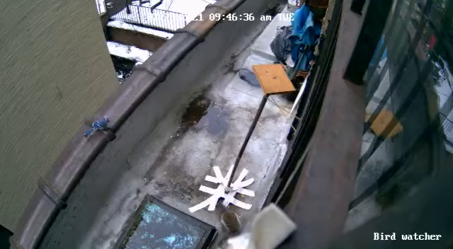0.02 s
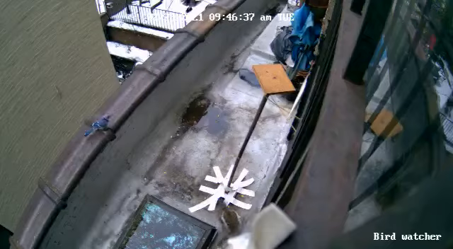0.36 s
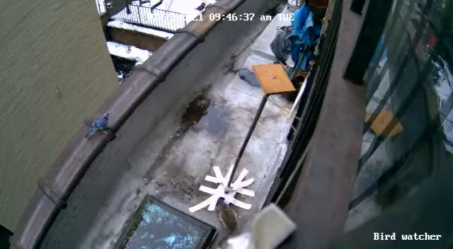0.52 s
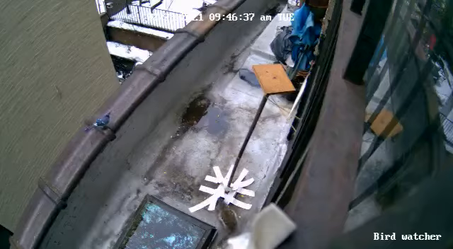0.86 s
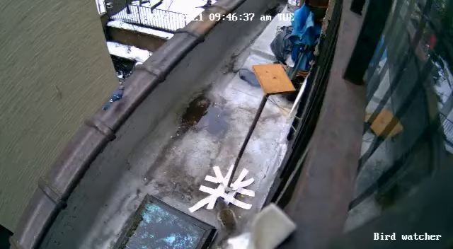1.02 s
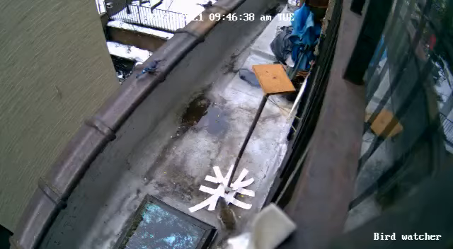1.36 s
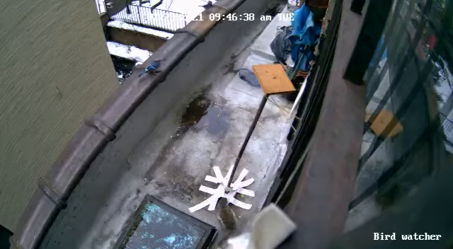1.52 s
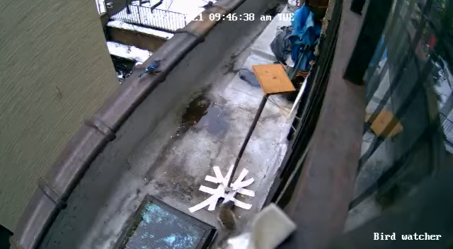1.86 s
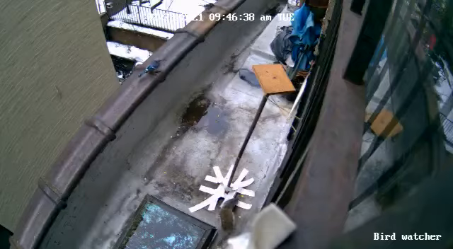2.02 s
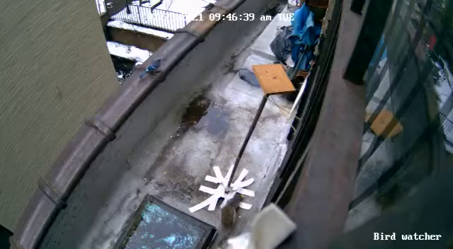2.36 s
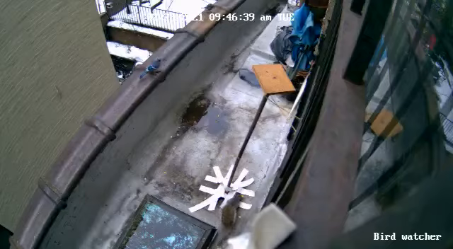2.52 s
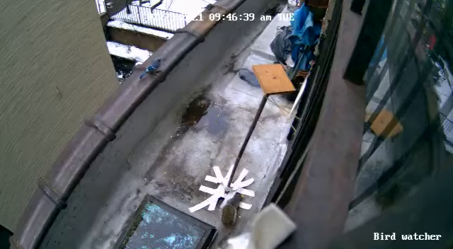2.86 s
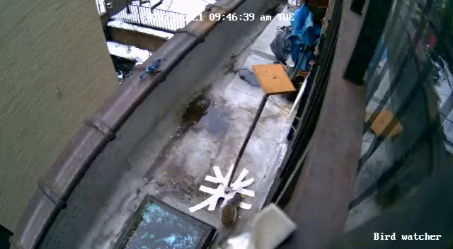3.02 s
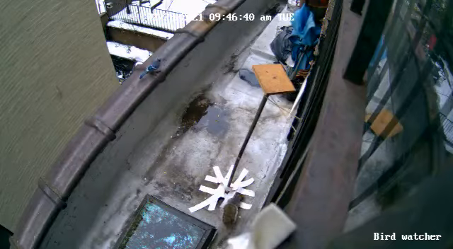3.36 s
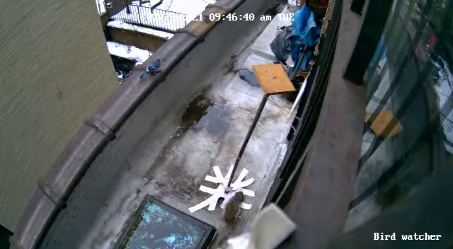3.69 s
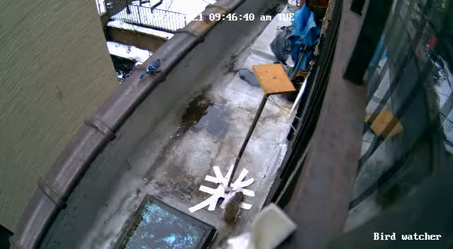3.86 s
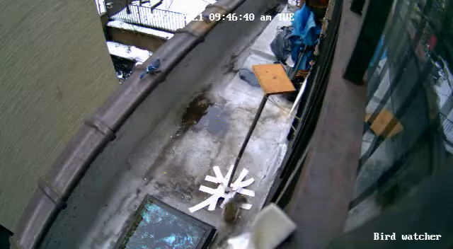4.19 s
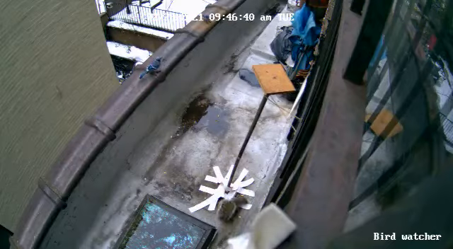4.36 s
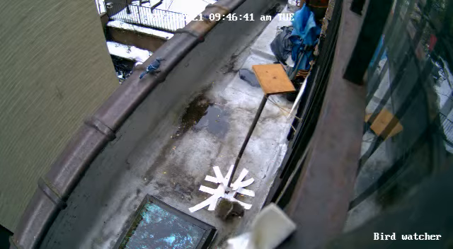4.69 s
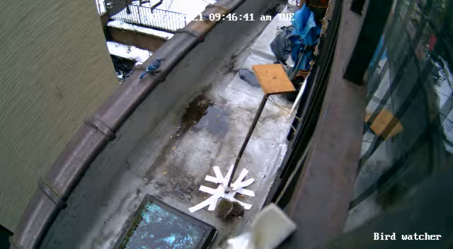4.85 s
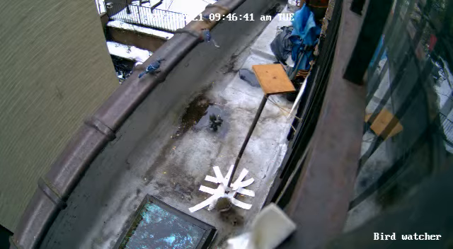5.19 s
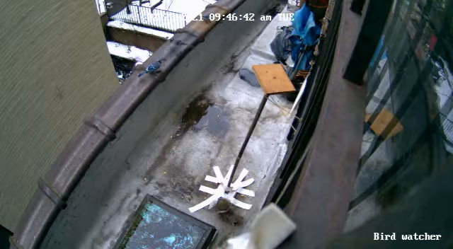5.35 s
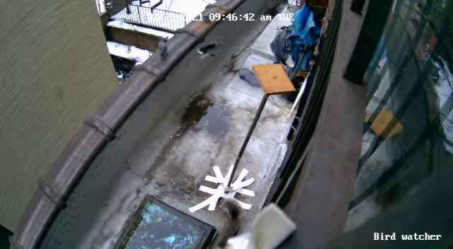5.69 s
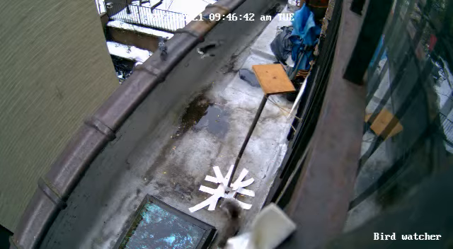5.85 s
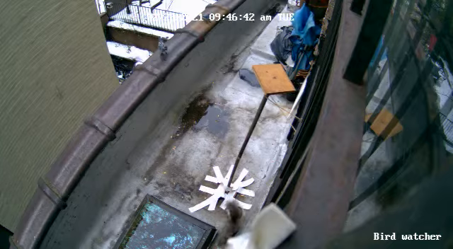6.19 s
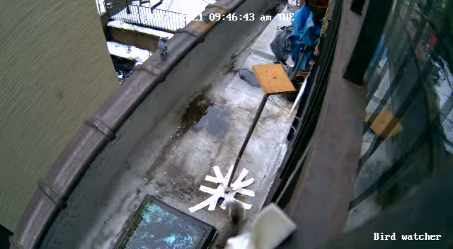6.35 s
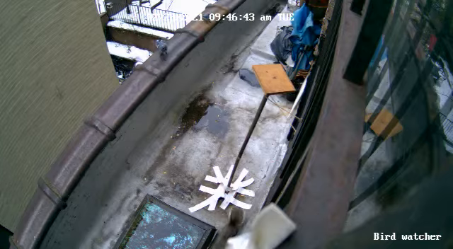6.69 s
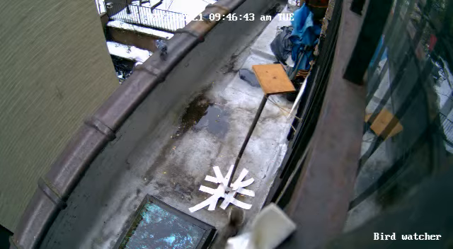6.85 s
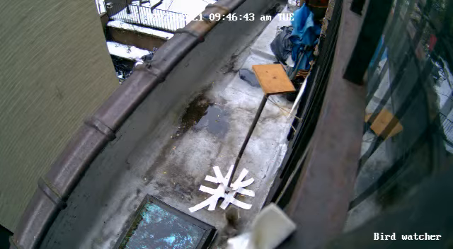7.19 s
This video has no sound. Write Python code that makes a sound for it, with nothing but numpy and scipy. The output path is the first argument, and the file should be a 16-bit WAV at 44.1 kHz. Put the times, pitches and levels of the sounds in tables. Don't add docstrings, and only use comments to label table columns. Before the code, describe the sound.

Short, grating jay-like calls come singly, about one to two seconds apart, ringing off hard walls. Dry claw ticks and wing flicks sit close by between the first two; a small knock and distant thin whistles come before the third. After the fourth and loudest call, feathers flap in a brief rapid flight. Low city rumble and hum continue throughout, captured by a lo-fi outdoor camera.

```python
import sys
import numpy as np
from scipy import signal
from scipy.fft import rfft, irfft, next_fast_len
from scipy.io import wavfile
from scipy.ndimage import uniform_filter1d, map_coordinates

SR = 44100
rng = np.random.default_rng(int(sys.argv[2]) if len(sys.argv) > 2 else 0)


def gain_from_decibels(decibels):
    exponent = np.asarray(decibels, float) / 20
    return 10 ** exponent


def inscribe(sig):
    pcm = np.round(np.clip(np.atleast_2d(sig).T, -1, 1) * 32767)
    wavfile.write(sys.argv[1], SR, pcm.astype(np.int16))


N = 322350
LEAD = SR // 4
TIME = np.arange(-LEAD, N) / SR


def unit(x):
    return x / np.sqrt(np.mean(np.abs(x) ** 2) + 1e-20)


def along(points, hz):
    f, v = np.transpose(points)
    return np.interp(np.log(hz + 1), np.log(f + 1), v)


def curves(rows, t):
    s, *cols = np.transpose(rows)
    return [np.interp(t, s, c) for c in cols]


def wobble(rate, size):
    knots = rng.standard_normal(int(size * 2000 / SR) + 4)
    return map_coordinates(knots, [np.arange(size) * rate / SR])


def rush(spectrum):
    m = next_fast_len(len(TIME))
    white = rfft(rng.standard_normal(m))
    colour = gain_from_decibels(along(spectrum, np.fft.rfftfreq(m, 1 / SR)))
    return unit(irfft(white * colour, m)[:len(TIME)])


def add(track, s, sound):
    part = track[LEAD + round(s * SR):][:len(sound)]
    part += sound[:len(part)]


def tone(rows):
    hz, db = curves(rows, TIME)
    sounding = (TIME >= rows[0][0]) & (TIME < rows[-1][0])
    return np.sqrt(2) * gain_from_decibels(db) * sounding * np.sin(2 * np.pi * np.cumsum(hz) / SR)


# hz, density_db
TRAFFIC_SPECTRUM = [(7, -39), (14, -6), (36, 0), (52, -5), (74, -2), (90, -10.5), (112, -4), (138, -17),
                    (162, -11.5), (195, -23.5), (258, -22), (400, -32.5), (520, -56.5), (880, -120)]
# hz, density_db
AIR_SPECTRUM = [(100, -30), (200, -2), (310, -4.5), (500, -10.5), (800, -19), (1100, -20), (1600, -21.5),
                (2000, -29), (3000, -28.5), (4500, -33.5), (8000, -40.5)]


def traffic():
    low_db = -37.5 + 0.56 * wobble(2.5, len(TIME)) + 0.27 * wobble(6, len(TIME))
    high_db = -52 + 0.36 * wobble(2.2, len(TIME)) + 0.71 * wobble(9, len(TIME))
    return gain_from_decibels(low_db) * rush(TRAFFIC_SPECTRUM) + gain_from_decibels(high_db) * rush(AIR_SPECTRUM)


# time_s, level_db
MACHINE_LOAD = [(0.0, -50.5), (0.3, -37.5), (1.79, -39), (2.79, -42), (2.91, -34), (3.36, -36.5),
                (3.44, -46.5), (3.68, -34.5), (4.4, -39.5), (5.27, -38.5), (5.41, -48), (5.52, -40),
                (6.6, -36.5), (6.9, -50), (7.25, -38.5), (7.31, -32)]


def machine_hum():
    drive_hz, drift_hz = 50.27, .8
    phase = 2 * np.pi * np.cumsum(drive_hz + drift_hz * wobble(3, len(TIME))) / SR
    level_db = curves(MACHINE_LOAD, TIME)[0] + 1.5 * wobble(8, len(TIME))
    return np.sqrt(2) * gain_from_decibels(level_db) * np.sin(phase)


# time_s, pitch_hz, level_db
MOTOR_WHINE = [
    (1.2, 1647, -115),
    (1.4, 1630, -75),
    (1.9, 1633, -71.5),
    (2.15, 1600, -87.5),
]


def far_motor():
    return tone(MOTOR_WHINE) * gain_from_decibels(4 * wobble(25, len(TIME)))


# time_s, pitch_hz, level_db
FAR_WHISTLE = [
    (2.29, 3400, -99),
    (2.325, 3448, -54.5),
    (2.36, 3497, -61.5),
    (2.4, 3440, -67),
    (2.45, 3560, -66),
    (2.47, 3284, -88.5),
]
# time_s, pitch_hz, level_db
FAR_SLUR = [
    (2.31, 2880, -93),
    (2.36, 3000, -68.5),
    (2.43, 3375, -62.5),
    (2.49, 3773, -65),
    (2.55, 3878, -73),
    (2.63, 3550, -74),
    (2.72, 3296, -74),
    (2.82, 3625, -74),
    (2.88, 3190, -90),
]


def far_birds():
    return (tone(FAR_WHISTLE) + tone(FAR_SLUR)) * gain_from_decibels(1.9 * wobble(60, len(TIME)))


# hz, t60_s
YARD_T60 = [(1000, 0.8), (3500, 0.78), (6000, 0.7), (9000, 0.39)]
# delay_s, level_db
WALL_ECHOES = [(.035, -7), (.052, -15), (.069, -12), (.09, -16)]


def yard(x, tail_db):
    hz, t, z = signal.stft(rng.standard_normal(SR + SR // 2), SR, nperseg=256)
    decay = gain_from_decibels(-60 * t / along(YARD_T60, hz)[:, None])
    build_up = 1 - np.exp(-t / .03)
    answer = signal.istft(z * decay * build_up, SR, nperseg=256)[1]
    answer *= gain_from_decibels(tail_db) / np.linalg.norm(answer)
    for delay, db in WALL_ECHOES:
        answer[round(delay * SR)] += gain_from_decibels(db)
    return signal.fftconvolve(x, answer)[:len(x)]


# peak_s, level_db, length_s,
# tilt_db_per_octave
WING_STROKES = [(0.062, -51, .012, 0), (0.099, -53.5, 0.019, -7), (0.157, -57.5, .02, -4),
                (1.124, -44, 0.0039, -1), (1.159, -44.5, 0.0055, -1), (4.451, -44.5, 0.01, 7),
                (4.493, -45, 0.0081, 6), (4.522, -56, 0.0055, -6), (5.13, -76, 0.02, 24),
                (5.178, -55.5, 0.014, -1.5), (5.196, -43.5, 0.0067, 0), (5.327, -47.5, 0.011, 8.5),
                (5.378, -58.5, 0.016, 1.5), (5.425, -54.5, 0.0085, 0), (5.766, -59, 0.01, 10),
                (6.354, -58, 0.026, 2), (6.678, -58.5, .012, 0), (6.94, -62, 0.019, 1.5),
                (7.29, -55.5, 0.012, 2)]


def strokes():
    first_s, period_s, slowing_s, nearest_s = 5.813, .055, .0012, 6.04
    peak_db, fade_db_per_s, length_s = -48, -25.5, .008
    flight = []
    for k in range(7):
        s = first_s + k * period_s + k * k * slowing_s
        db = peak_db + fade_db_per_s * abs(s - nearest_s) + rng.normal(0, 1.7)
        flight.append((s, db, length_s, 1.5 - 0.5 * k))
    return [*WING_STROKES, *flight]


# start_s, length_s, peak_db, swell_s
FEATHER_RUSTLES = [
    (-.03, 0.24, -65.5, .1),
    (1.008, 0.19, -64.5, .1),
    (5.806, .41, -55.5, .3),
]


def rustle():
    out = np.zeros(len(TIME))
    start_db, sag_db_per_s, edge_s = -6, -49, 0.018
    for s, length, db, swell in FEATHER_RUSTLES:
        u = TIME - s
        rising_db, sagging_db = start_db * (1 - u / swell), sag_db_per_s * (u - swell)
        level_db = db + np.where(u < swell, rising_db, sagging_db)
        out += gain_from_decibels(np.minimum(level_db, db)) * np.clip(np.minimum(u, length - u) / edge_s, 0, 1)
    return out


# hz, density_db
FEATHER_SPECTRUM = [(400, -41), (900, 0), (3000, -4), (6500, -2.5), (9000, 3)]


def wings():
    out, t = np.zeros(len(TIME)), np.arange(SR // 8) / SR
    octaves = np.log2(np.fft.rfftfreq(len(t), 1 / SR) / 4000 + 0.0019)
    low_cut = np.minimum(1, 2 ** (2 * octaves + 2.8))
    for s, db, length, tilt_db in strokes():
        white = rfft(rng.standard_normal(len(t)))
        air = irfft(white * gain_from_decibels(tilt_db * octaves) * low_cut, len(t))
        u = t / length
        feathers = gain_from_decibels(2.2 * wobble(500, len(t)))
        add(out, s - length, gain_from_decibels(db - 1) * unit(air) * feathers * u * np.exp(1 - u))
    return out + rustle() * gain_from_decibels(3.9 * wobble(250, len(TIME))) * rush(FEATHER_SPECTRUM)


# time_s, peak_db, ring_hz, crack_db
CLAW_CONTACTS = [(0.8733, -36.5, 7420, -23.5), (0.908, -21, 7560, -11.5), (0.916, -31.5, 6620, -24),
                 (0.9297, -31, 6840, -13.5), (1.0064, -25.5, 7830, -7), (1.0223, -31.5, 8150, -5),
                 (1.056, -63, 7200, 12.5), (1.11, -35.5, 6010, -8), (1.1217, -30.5, 6070, -5),
                 (1.135, -38.5, 7520, -15.5), (1.156, -42, 6830, -8), (1.2052, -74, 7870, -14),
                 (1.2152, -76.5, 6180, 0)]


def claws():
    out, t = np.zeros(len(TIME)), np.arange(SR // 20) / SR
    for s, db, hz, crack_db in CLAW_CONTACTS:
        ring = np.sin(2 * np.pi * hz * t) * gain_from_decibels(-60 * t / .006)
        crack = rng.standard_normal(len(t)) * gain_from_decibels(crack_db - 60 * t / 0.0059)
        add(out, s, gain_from_decibels(db) * np.diff(ring + crack, prepend=0))
    return out


# time_s, peak_db, ring_hz, crack_db
LEDGE_KNOCK = [
    (2.136, -35, 1090, -8.5),
]


def knock():
    out, t = np.zeros(len(TIME)), np.arange(SR // 20) / SR
    for s, db, hz, crack_db in LEDGE_KNOCK:
        modes = np.sin(2 * np.pi * hz * t) + 0.55 * np.sin(2 * np.pi * 1400 * t)
        ring = modes * gain_from_decibels(-11.0 - 60 * t / 0.046)
        dull = uniform_filter1d(rng.standard_normal(len(t)), size=5)
        add(out, s, gain_from_decibels(db) * (ring + gain_from_decibels(crack_db + 9.5 - 60 * t / 0.009) * dull))
    return out


def jay(rows, rough_db, width_hz, upper_db):
    t = rows[0][0] + np.arange(SR // 4) / SR
    pitch, throat, db, odd = curves(rows, t)
    phase = 2 * np.pi * np.cumsum(pitch * (1 + 0.017 * wobble(110, len(t)))) / SR
    rasp = gain_from_decibels(np.minimum(db, -45.5) + rough_db)
    voice = np.zeros(len(t))
    for k in range(5, 21):
        hz = k * pitch
        main = np.clip(odd, 0, 1) ** (k % 2) / (1 + ((hz - throat) / width_hz) ** 2)
        broad = 1 / (1 + ((hz - 1.03 * throat) / 480) ** 2) + gain_from_decibels(-20.5) * 4000 / hz
        beak_hz = np.minimum(1.24 * throat, 5500)
        beak = gain_from_decibels(upper_db) / (1 + ((hz - beak_hz) / 450) ** 2)
        waver = 1 + .3 * (wobble(220, len(t)) + 1j * wobble(220, len(t)))
        flutter = wobble(550, len(t)) + 1j * wobble(550, len(t))
        strength = gain_from_decibels(db) * main * waver + rasp * (broad + beak) * flutter
        voice += np.imag(strength * np.exp(1j * k * phase))
    return voice * (t < rows[-1][0])


# time_from_loudest_s, share_of_lead_in_throat, level_db
SQUEAK = [
    (-.05, 0.63, -79.5),
    (-.032, 0.6, -55),
    (-.02, 1.03, -47),
]
# time_from_loudest_s, throat_over_pitch, odd_harmonic_share
THROAT_PATH = [
    (-.014, 10, .2),
    (-.001, 10, .2),
    (.014, 9.8, .6),
    (.031, 9, .9),
    (.049, 8, .4),
    (.068, 6.8, .9),
    (.102, 5.6, .5),
]


def call_rows(s, db, hz, lead_hz, bridge_db):
    start_hz, second_hz, end_hz = 401.5, 408.1, 378
    t, throat, odd = np.transpose(THROAT_PATH)
    pitch_hz = [.93 * hz, hz, .96 * hz, 1.035 * second_hz, second_hz, end_hz]
    pitch = np.interp(t, t[[0, 1, 2, 3, 4, 6]], pitch_hz)
    level_db = [db - 8, db, db - 11, db + bridge_db, -38, -46, -71]
    body = np.transpose([s + t, pitch, throat * pitch, level_db, odd])
    squeak = [(s + u, start_hz, share * lead_hz, quiet_db, .8) for u, share, quiet_db in SQUEAK]
    return np.vstack([squeak, body])


# loudest_s, level_db, pitch_hz, lead_in_throat_hz, bridge_db
JAY_CALLS = [
    (-.13, -41.5, 432.2, 4660, -7),
    (0.822, -36, 454.2, 5100, -8),
    (1.454, -36.5, 419.1, 4080, -13.5),
    (3.181, -35, 427, 5470, -1),
    (4.634, -33, 416, 5560, -8.5),
]


def jays():
    out = np.zeros(len(TIME))
    for row in JAY_CALLS:
        rows = call_rows(*row)
        call = np.pad(jay(rows, rough_db=-9.5, width_hz=230, upper_db=-2.5), (0, SR + SR // 4))
        add(out, rows[0][0], call + yard(call, tail_db=-6.5))
    return out


def scene():
    background = traffic() + machine_hum() + far_motor()
    far = far_birds()
    near = wings() + claws() + knock()
    mix = background + .6 * far + yard(far, tail_db=-7.5)
    mix += near + gain_from_decibels(-16.5) * yard(near, tail_db=-4.5) + jays()
    return mix[None, LEAD:]


BAND_EDGES = [136, 148, 160, 172, 184, 196, 212, 228, 244, 260, 280, 300, 320, 344, 368, 396, 424, 456, 492,
              532, 572, 616, 664, 716, 772, 832, 896, 960, 1024]
# hz, level_db
SURVIVAL_FLOOR = [(1000, -73), (2500, -64), (4000, -63.5), (8000, -68.5)]


def camera_rounding(x, noise_db):
    size, offset = 1024, 422
    n = np.arange(2 * size)
    window = signal.windows.kaiser_bessel_derived(2 * size, 4 * np.pi)
    cosines = np.cos(np.pi / size * np.outer(n + .5 + size / 2, n[:size] + .5))
    basis = np.sqrt(2 / size) * window[:, None] * cosines
    padded = np.pad(x, (2 * size - offset, 3 * size))
    lines = np.lib.stride_tricks.sliding_window_view(padded, 2 * size)[::size] @ basis
    treble_db = 10 * np.log10(np.mean(lines[:, size // 3:] ** 2, axis=1) + 1e-12)
    rise_db = np.diff(treble_db, prepend=treble_db[0])
    thrift_db = 2 - np.clip(.5 * rise_db, 0, 7)[:, None]
    for lo, hi in zip(BAND_EDGES, BAND_EDGES[1:]):
        band = lines[:, lo:hi]
        rms = np.sqrt(np.mean(band ** 2, axis=1, keepdims=True)) + 1e-9
        whim_db = rng.normal(0, 1.2, rms.shape)
        step = rms * gain_from_decibels(noise_db)
        survives = rms > gain_from_decibels(along(SURVIVAL_FLOOR, lo * 8000 / size) + thrift_db + whim_db)
        lines[:, lo:hi] = np.round(band / step) * step * survives
    frames = lines @ basis.T
    out = frames[1:, :size] + frames[:-1, size:]
    return out.ravel()[size - offset:][:len(x)]


def band_limit(x):
    return signal.sosfilt(signal.butter(12, 8950, fs=SR, output="sos"), x)


def record(dry):
    slow = signal.resample_poly(dry[0], 160, 441, window=signal.firwin(441 * 60 + 1, 1.03 / 441))
    rounded = camera_rounding(slow, noise_db=2.5)
    leaky = signal.firwin(441 * 32 + 1, .99 / 441, window=("kaiser", 7.))
    full = signal.resample_poly(rounded, 441, 160, window=leaky)[:N]
    full = full - .0046 + gain_from_decibels(-101) * rng.standard_normal(N)
    return band_limit(full[None])


dry = scene()
out = record(dry)
inscribe(out)
```